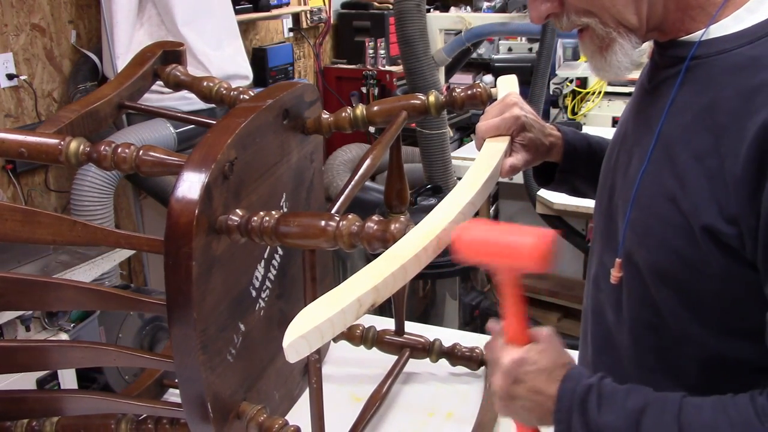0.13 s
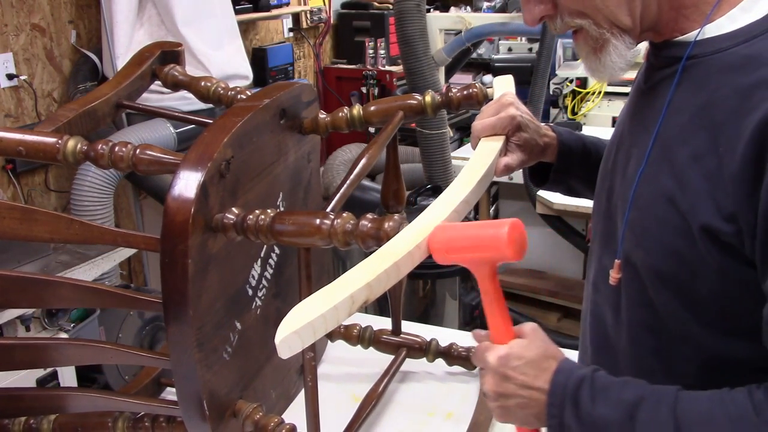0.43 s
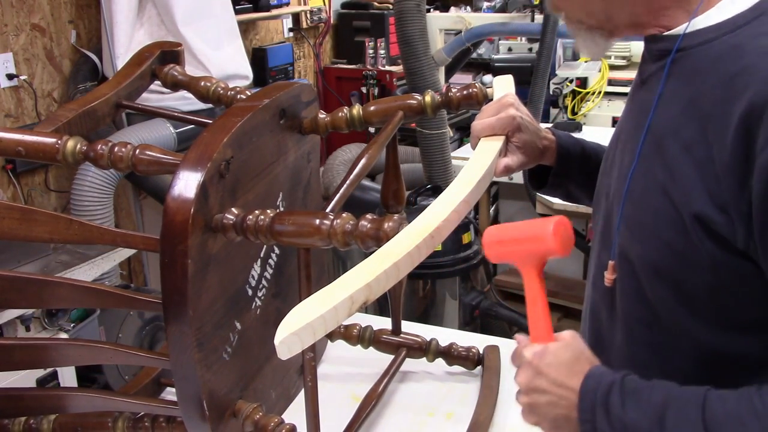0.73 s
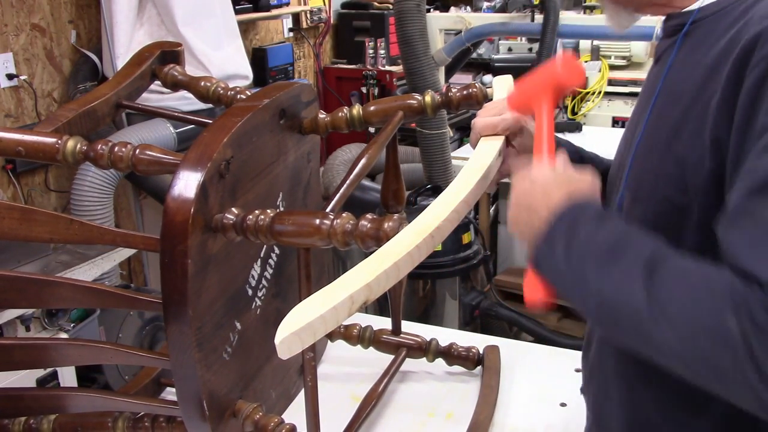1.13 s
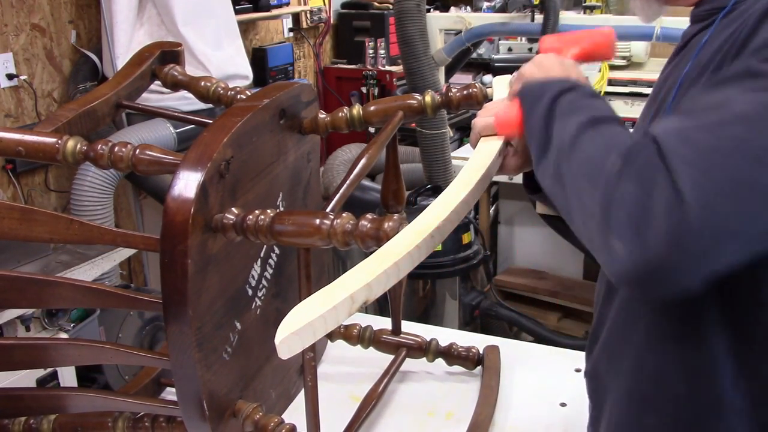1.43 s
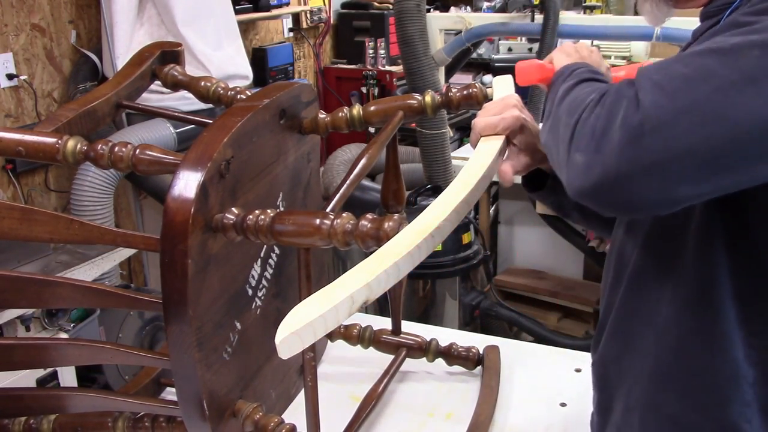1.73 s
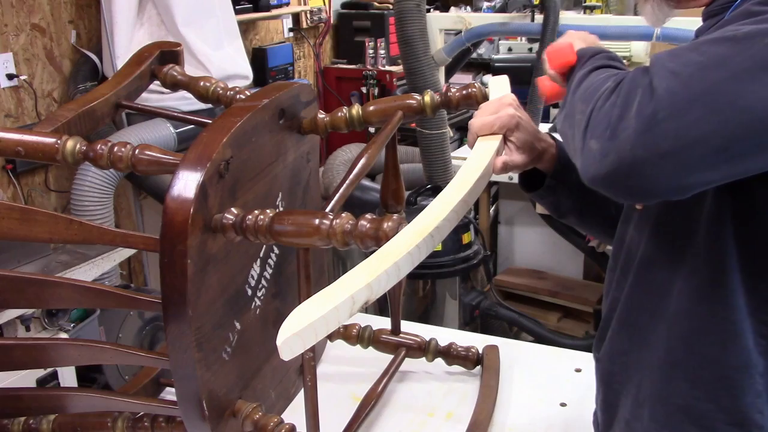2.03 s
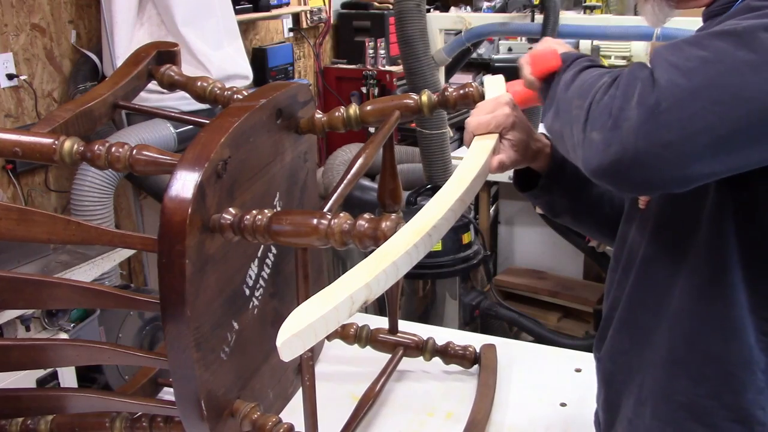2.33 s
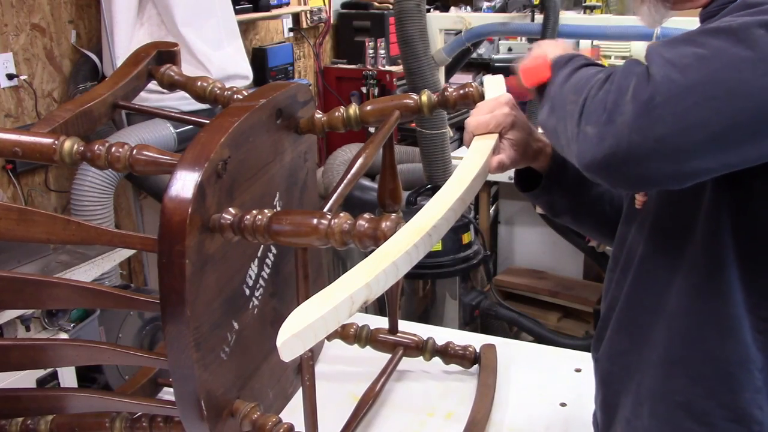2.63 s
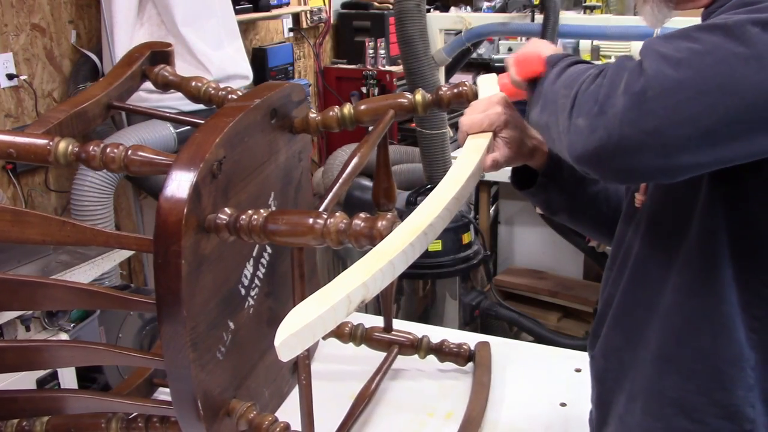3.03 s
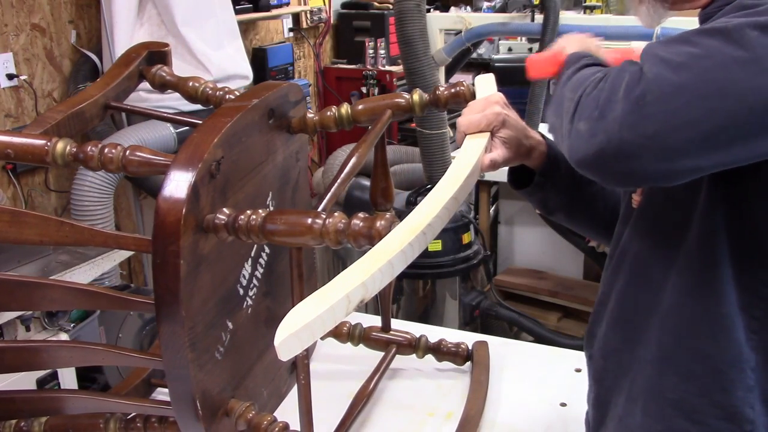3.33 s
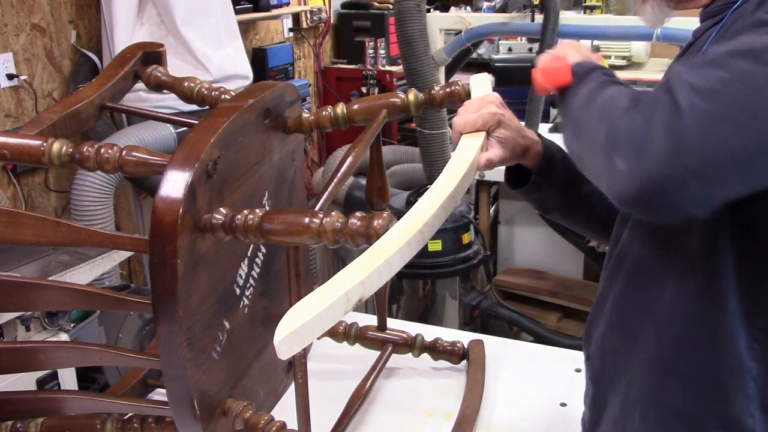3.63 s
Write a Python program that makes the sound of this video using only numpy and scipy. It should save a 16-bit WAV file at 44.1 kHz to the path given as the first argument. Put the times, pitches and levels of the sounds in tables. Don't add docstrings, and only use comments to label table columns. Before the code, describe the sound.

A shot-filled mallet strikes a wooden chair rocker twice, brushes it lightly during a pause, then lands two lighter and three hard blows, close-miked in a hard-walled workshop with faint motor hum.

```python
import sys
import numpy as np
from scipy import signal
from scipy.io import wavfile

SR = 44100
rng = np.random.default_rng(int(sys.argv[2]) if len(sys.argv) > 2 else 0)


def wav_record(signal):
    frames = np.transpose(np.atleast_2d(signal))
    bounded = np.clip(frames, -1, 1)
    quanta = np.round(bounded * 32767).astype(np.int16)
    wavfile.write(sys.argv[1], SR, quanta)


def boost_factor(decibels):
    exponent = np.asarray(decibels, float) / 20
    return 10 ** exponent


N = 167580


def rms_one(x):
    return x / np.sqrt(np.mean(x ** 2) + 1e-20)


def at_hz(points, hz):
    return np.interp(np.log(hz), np.log(np.array(points)[:, 0]), np.array(points)[:, 1])


def butter(x, order, hz, kind="low"):
    return signal.sosfilt(signal.butter(order, hz, kind, fs=SR, output="sos"), x)


def clicks(at, db):
    x = np.zeros(N)
    x[at] = boost_factor(db)
    return x


def ring(x, hz, t60):
    r, w = boost_factor(-60 / (t60 * SR)), 2 * np.pi * hz / SR
    return signal.lfilter([0, np.sin(w)], [1, -2 * r * np.cos(w), r * r], x + 1e-18)


def resonance(x, hz, width_hz):
    r, w = np.exp(-np.pi * width_hz / SR), 2 * np.pi * hz / SR
    return signal.lfilter(np.array([1, 0, -1]) * (1 - r * r) / 2, [1, -2 * r * np.cos(w), r * r], x)


def bands(white, gain):
    # frequency in Hz, side level in dB.
    side_db = [(60, -14), (250, -28), (1000, -21), (4000, -13.5), (8000, -14), (13000, -3)]
    out, edges = 0, 36 * 2 ** np.arange(0, 9.1, .5)
    for k, (low, high) in enumerate(zip(edges, edges[1:])):
        mid, side = butter(white[k % 2], 2, [low, high], "band")
        hz = np.sqrt(low * high)
        out = out + gain(hz) * (mid + boost_factor(at_hz(side_db, hz)) * side * [[1], [-1]])
    return out


def room_air():
    # frequency in Hz, density in dB per Hz.
    air_colour = [(24, -89), (40, -65.5), (114, -6.5), (179, -21.5), (359, -8.5), (653, -19), (797, -18),
                  (1190, -23.5), (15500, -44)]
    air = bands(rng.standard_normal((2, 2, N)), lambda hz: boost_factor(at_hz(air_colour, hz)))
    return boost_factor(-52) * rms_one(air)


def distant_motor():
    # time in seconds, pitch in Hz, rms level in dB.
    hum = [(0, 122, -52.5), (0.799, 119, -59), (1.101, 118.5, -52), (1.5, 115, -47), (1.9, 110, -51),
           (2.3, 108.4, -52), (2.698, 102, -53), (3.8, 94.2, -68)]
    s, hz, db = np.transpose(hum)
    t = np.arange(N) / SR
    phase = 2 * np.pi * np.cumsum(np.interp(t, s, hz)) / SR
    return np.sqrt(2) * boost_factor(np.interp(t, s, db)) * np.sin(phase)


def sliding_shot():
    # peak in seconds, rise in seconds, level in dB, hollow ring in dB.
    slides = [
        (0.011, 0.028, -41.5, -6),
        (0.341, 0.019, -32.5, -21.5),
        (1.425, 0.022, -61, -6.5),
        (1.495, 0.0325, -63.5, -15),
        (1.871, 0.059, -58, -2.5),
        (2.297, 0.054, -50, -4.5),
        (2.687, 0.053, -49.5, -1.5),
        (3.045, 0.044, -47.5, -5),
        (3.419, 0.069, -50, -5),
        (3.79, .05, -71, -5),
    ]
    # frequency in Hz, density in dB per Hz.
    patter_colour = [(1180, -39), (2000, -11.5), (2820, -14), (4710, -10.5), (6360, -4.5), (11600, -18),
                     (15500, -22.5)]
    fall_share, pellets_per_s, size_spread_db = 0.26, 7200, 1.3
    head_hz, head_width_hz = 2800, 330
    t, patter_level, hollow = np.arange(N) / SR, 0, 0
    for s, rise, db, ring_db in slides:
        spread = np.where(t < s, .5, fall_share / 2) * rise
        swell = boost_factor(db) * np.exp(-.5 * ((t - s) / spread) ** 2)
        patter_level = patter_level + swell
        hollow = hollow + swell * boost_factor(ring_db)
    sizes = boost_factor(size_spread_db * np.minimum(rng.exponential(1, (2, 2, N)), 4))
    sizes = sizes * rng.choice([-1, 1], (2, 2, N))
    pellets = sizes * (rng.random((2, 2, N)) < pellets_per_s / SR)
    shell = resonance(pellets[0, 0], head_hz, head_width_hz)
    shell = resonance(shell, head_hz, head_width_hz)
    patter = bands(pellets, lambda hz: boost_factor(at_hz(patter_colour, hz)) * (hz > 1800))
    return patter_level * rms_one(patter) + hollow * boost_factor(-1) * rms_one(shell)


def wood_modes(at, force, seat_db, chair_db, leg_db, local_hz, local_db, ring_share):
    # frequency in Hz, level in dB, t60 in seconds.
    seat = [(175.4, -16, 0.07), (256.2, -12, 0.064), (330, -19.5, 0.019)]
    chair = [(407.2, -5.5, 0.11), (463.3, -0.5, 0.072), (560.5, -1.5, 0.018), (684, -10, 0.044)]
    rail = [(844, 0.5, 0.018), (1011, 4, 0.021), (1109, 0, 0.01)]
    leg = [(1346, -3.5, 0.019), (1600, -3, .02), (1920, -3, 0.006), (2595, -14, 0.036), (3136, -9, 0.0044)]
    mode_spread_db, local_t60_s = 1.5, 0.046
    out = np.zeros(N)
    for modes, part_db in ((seat, chair_db + seat_db), (chair, chair_db), (rail, 0), (leg, leg_db)):
        for k, (hz, db, t60) in enumerate(modes):
            uneven = mode_spread_db * rng.standard_normal(len(at))
            struck = clicks(at, force + part_db + db - 10.5 + uneven)
            out += ring(struck, hz, t60 * ring_share) * (-1) ** k
    for i, hz, db in zip(at, local_hz, force + local_db):
        out += ring(clicks(i, db - 16.5), hz, local_t60_s * ring_share)
    return out / np.sqrt(ring_share)


def crack(at, db):
    snap = butter(clicks(at, db + 1), 1, [1477, 3003], "band")
    return butter(snap, 1, 4560)


def landing_shot(at, db, rattle):
    lands_s = .005
    pellets = clicks(at, db - 27.5)
    if rattle:
        decay = np.exp(-1 / (lands_s * SR))
        pellets = signal.lfilter([1], [1, -decay], pellets) * rng.standard_normal(N)
    else:
        pellets = np.roll(pellets, int(lands_s * SR)) * boost_factor(15)
    pellets = butter(pellets, 1, [4800, 7950], "band")
    return boost_factor(-1.5) * pellets + boost_factor(2.5) * resonance(pellets, 6270, 530)


def mallet_on_wood(ring_share, rattle):
    # start in seconds, force in dB, then chair body, leg knock and crack in dB re rail.
    blows = [
        (0.050, 10.5, -3, 10, -1.5),
        (0.397, 14.5, -5, 8, 0.5),
        (1.9399, -7, -3.5, 4, 7.5),
        (2.347, -5.5, -2, 6.5, 0),
        (2.730, 8, -2, -1.5, 8.5),
        (3.0993, 11, -5, -0.5, 10),
        (3.478, 13.5, -6.5, 0, 8.5),
    ]
    touches = [
        (1.093, -31, -6, 0.5, 9),
        (1.105, -38.5, -19, 3, 5.5),
        (1.135, -52, 12, -14, -10),
    ]
    # seat boom in dB, landing shot in dB, local ring in Hz,
    # local ring in dB.
    places = [(-7.5, 11, 1800, -15.5), (-8.5, 1.5, 1500, -10.5), (-17, 4.5, 740, 4.5), (11, 8.5, 1703, 5.5),
              (-3, -2, 943, 1.5), (-6, -9, 981, 4), (-8.5, -0.5, 982, 4), (-8.5, 12, 970, 0),
              (-10, 0, 1550, 4), (6, -2, 550, -6)]
    joint_closes_s = .0022
    s, force, chair_db, leg_db, crack_db = np.transpose(blows + touches)
    seat_db, lands_db, local_hz, local_db = np.transpose(places)
    at = (s * SR).astype(int)
    body = wood_modes(at, force, seat_db, chair_db, leg_db, local_hz, local_db, ring_share)
    out = boost_factor(-3) * body
    if rattle:
        out = out - np.roll(boost_factor(-3) * body, int(joint_closes_s * SR)) * boost_factor(3)
    bright = crack(at, force + crack_db) + landing_shot(at, force + lands_db, rattle)
    return out + butter(bright, 3, 11300)


def bench_thumps():
    # start in seconds, level in dB.
    jolts = [(0.052, -46), (0.399, -46), (1.94, -58), (2.349, -45), (2.731, -38), (3.101, -29),
             (3.478, -26)]
    s, db = np.transpose(jolts)
    return butter(ring(clicks((s * SR).astype(int), db), 45, .06), 2, 120)


def workshop(x):
    # frequency in Hz, t60 in seconds.
    room_t60 = [(100, 0.696), (300, 0.2485), (1000, 0.3582), (3000, 0.3486), (8000, 0.2957), (14000, 0.17)]
    # frequency in Hz, level in dB.
    room_colour = [(100, -13.5), (250, 3), (700, -2.5), (2000, -4), (5000, -5), (14000, -1)]
    first_echo_s, echo_grain_s, early_db, early_t60_s = .004, .03, -5, 0.091
    t = np.arange(SR) / SR
    sparse = rng.random((2, 2, SR)) < .01 + t / echo_grain_s * .05
    echoes = rng.standard_normal((2, 2, SR)) * sparse
    echoes = echoes / np.sqrt(np.minimum(0.0034 + t / echo_grain_s * 0.017, 1))
    echoes = echoes * (t > first_echo_s) * (1 + boost_factor(early_db - 60 * t / early_t60_s))
    tail = bands(echoes, lambda hz: boost_factor(at_hz(room_colour, hz) - 60 * t / at_hz(room_t60, hz)))
    return boost_factor(-20) * signal.fftconvolve(x[None], tail, axes=1)[:, :N]


def scene():
    slide = sliding_shot()
    near = boost_factor(4.5) * mallet_on_wood(1, True) + slide
    far = boost_factor(3) * mallet_on_wood(0.51, False) + boost_factor(-8.5) * slide[0]
    heard = near + workshop(far)
    heard = heard + boost_factor(-13) * resonance(heard, 6050, 470)
    heard = heard - 0.33 * resonance(heard, 5070, 510)
    return heard * boost_factor([[-.2], [.2]]) + room_air() + distant_motor()


def roll_off(x):
    return signal.sosfilt(signal.butter(12, 15710, fs=SR, output="sos"), x)


def record(dry):
    limit_db, release_db_per_s, attack_s = -4, 400.5, 0.001946
    over = np.maximum(20 * np.log10(np.abs(dry).max(axis=0) + 1e-9) - limit_db, 0)
    ramp = release_db_per_s * np.arange(N) / SR
    held = np.maximum.accumulate(over + ramp) - ramp
    r = np.exp(-1 / (attack_s * SR))
    limited = dry * boost_factor(-signal.lfilter([1 - r], [1, -r], held))
    soft = limited / (1 + np.abs(limited) ** 4) ** .25
    out = butter(soft, 2, [186, 13000], "band") + bench_thumps()
    out = butter(np.clip(out, -.93, 1.0), 4, 13500)
    return roll_off(out)


dry = scene()
out = record(dry)
wav_record(out)
```